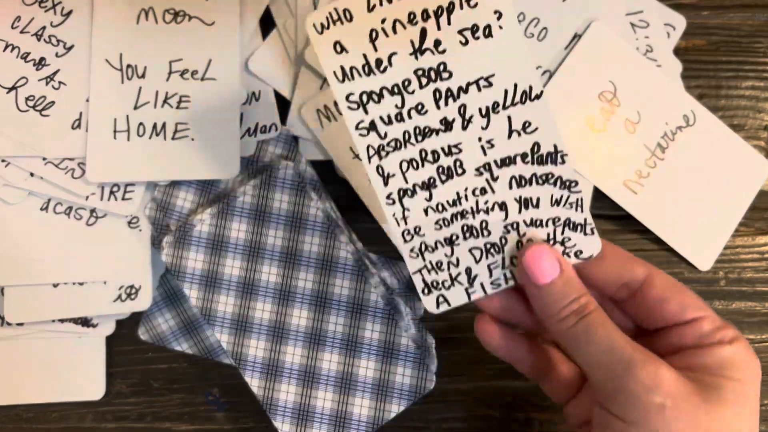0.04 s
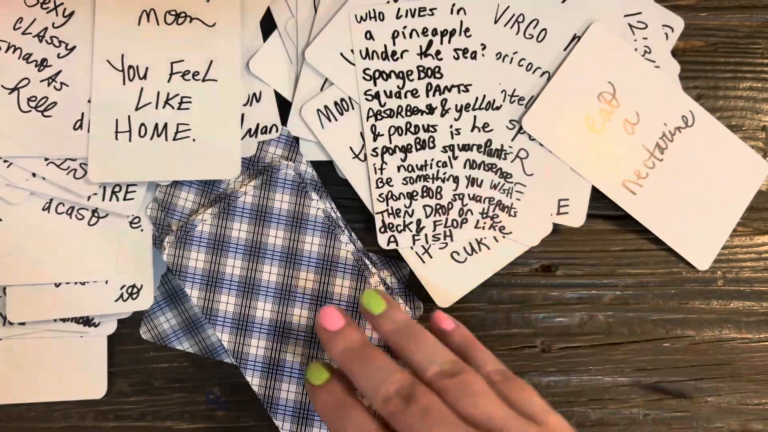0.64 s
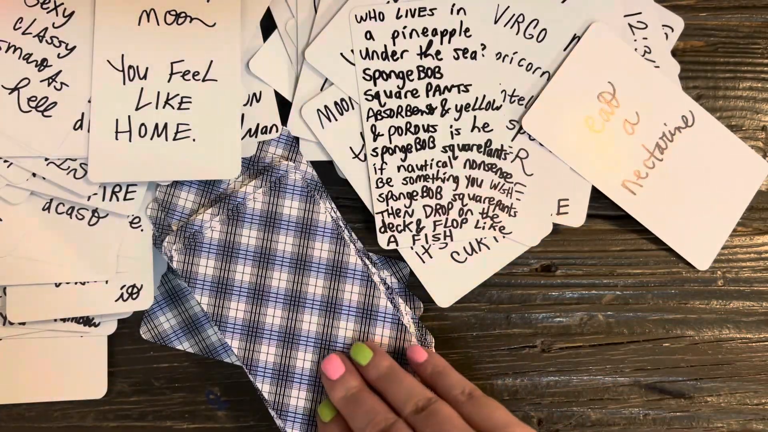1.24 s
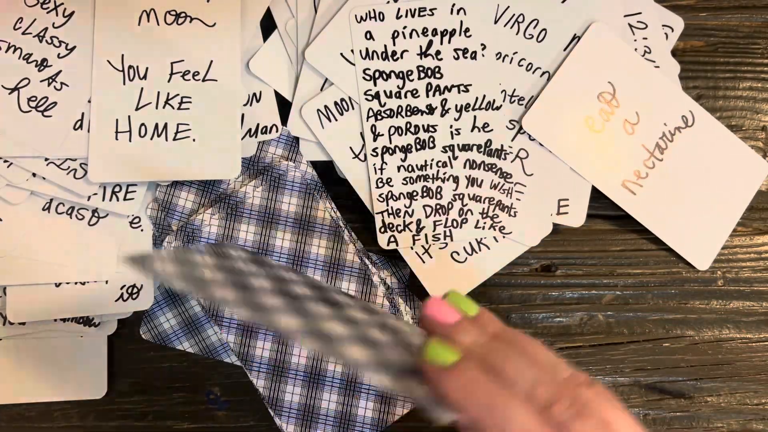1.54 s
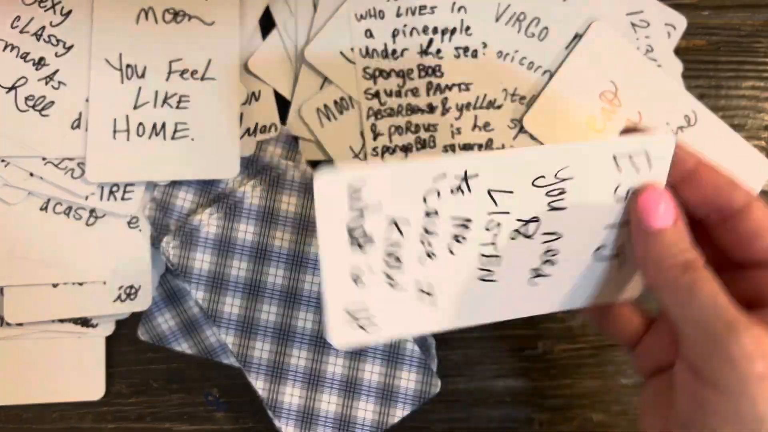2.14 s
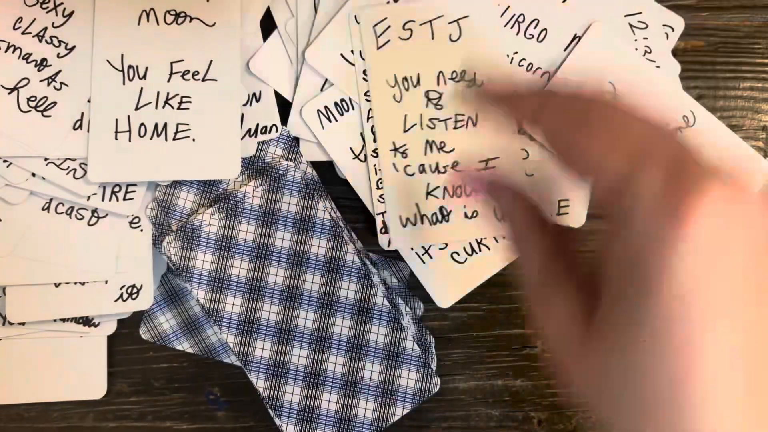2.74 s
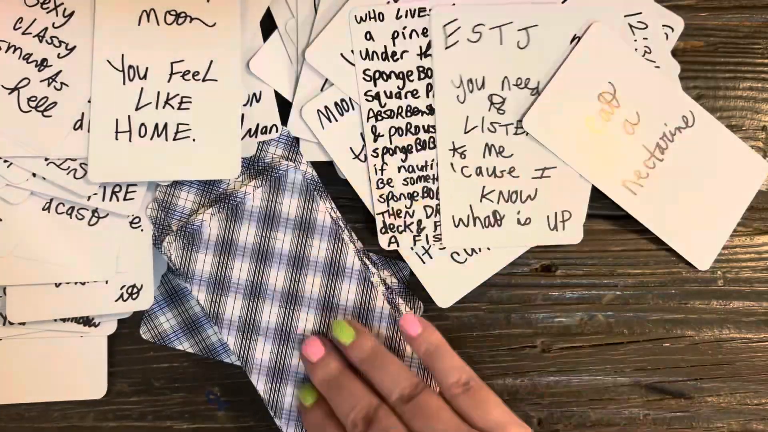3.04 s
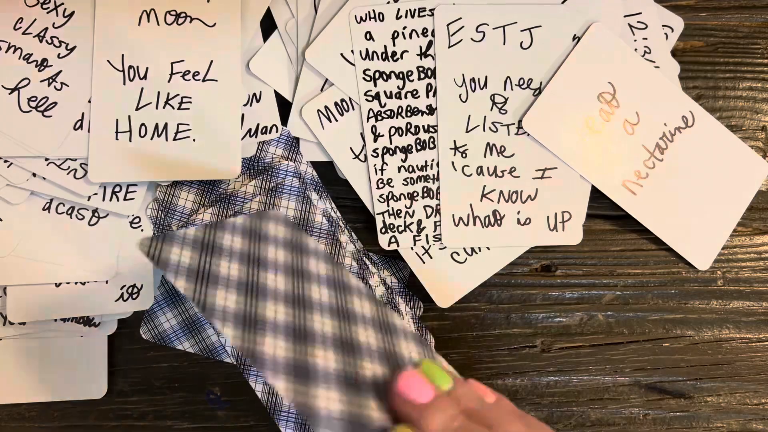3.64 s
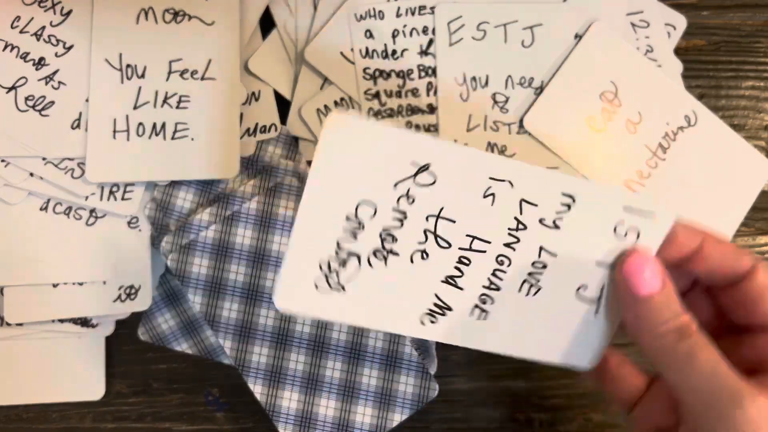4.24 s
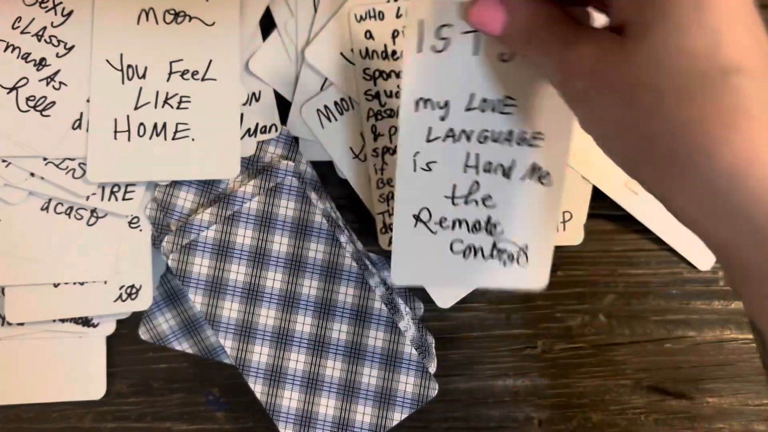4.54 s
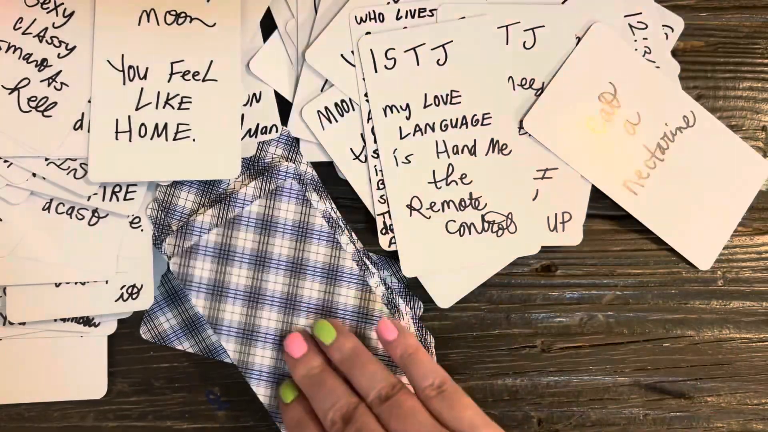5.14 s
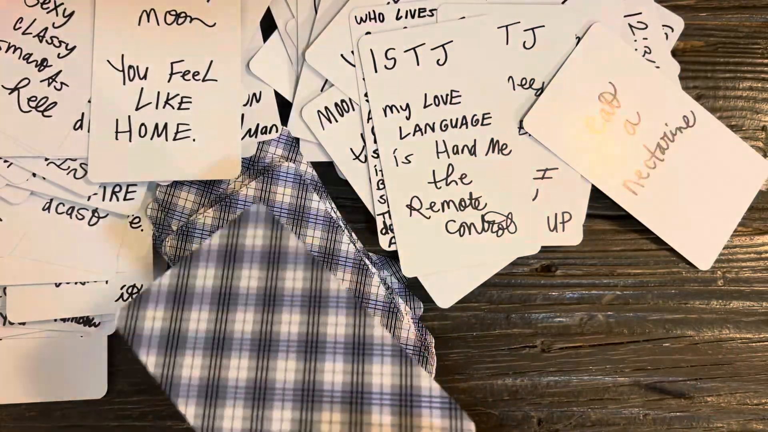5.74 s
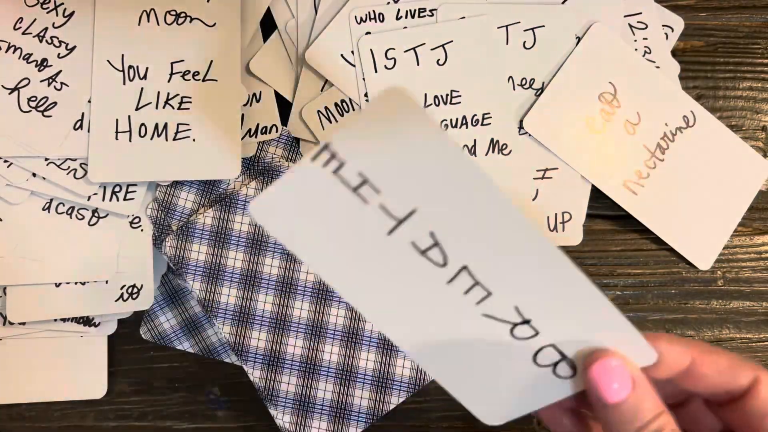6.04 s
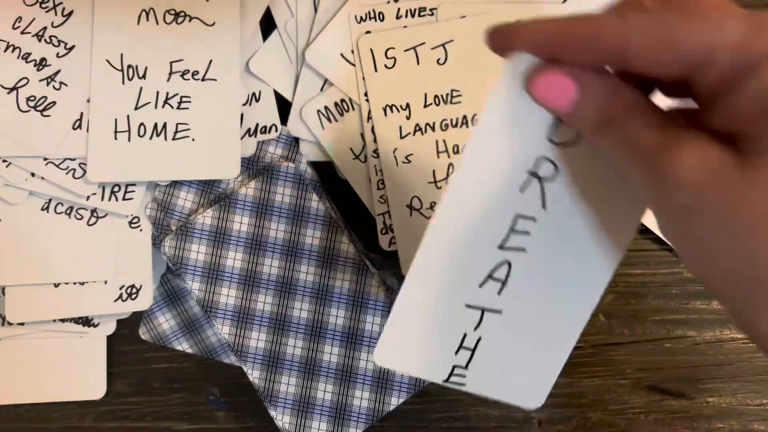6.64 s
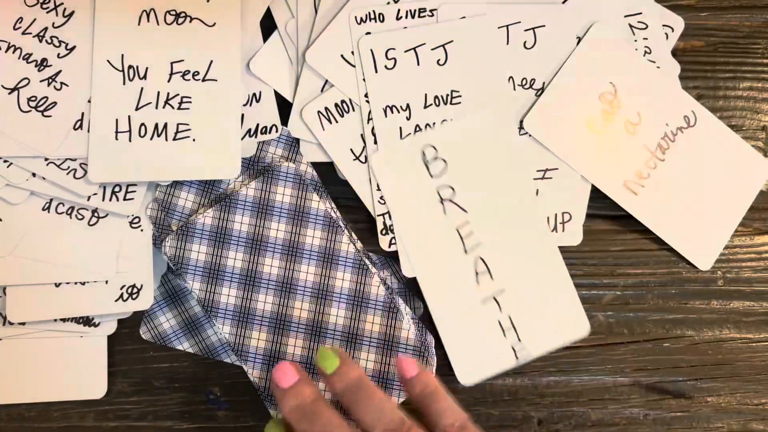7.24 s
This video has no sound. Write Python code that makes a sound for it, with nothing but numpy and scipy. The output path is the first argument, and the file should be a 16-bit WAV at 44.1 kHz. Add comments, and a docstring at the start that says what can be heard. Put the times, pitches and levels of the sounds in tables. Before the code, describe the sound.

Cards are drawn, turned over and set down one by one, with soft rasps, light taps and sharp snaps in a quiet room.

```python
"""Stiff paper cards are drawn off a deck, turned over and laid on a pile on a wooden table in a small room.
Each card rasps as it slides, clacks as its edge lands, and snaps flat when the thumb lets the bent corner go.
All card sounds are random clicks shaped by the card's resonances. Two closely spaced microphone ports
above the table pick them up with wall echoes, a low rumble and a faint machine hum."""
import sys
import numpy as np
from scipy import signal
from scipy.fft import rfft, irfft, next_fast_len
from scipy.io import wavfile

SR = 44100
rng = np.random.default_rng(int(sys.argv[2]) if len(sys.argv) > 2 else 0)


def master(y):
    """Save y as 16-bit WAV."""
    cut = np.clip(np.atleast_2d(y).T, -1, 1)
    pcm = np.round(cut * 32767)  # scale
    wavfile.write(sys.argv[1], SR, pcm.astype(np.int16))


N = 330309

# Frequencies in Hz at which a contact's colour and band levels are given. Card levels are relative.
CONTACT_HZ = [700, 1900, 4200, 8100, 14000]


def landings():
    """A card meets the pile edge first, slaps down on its face, then settles."""
    # Each row: slap time in s, clack, crack and sizzle in dB, clack and crack t60 in s, edge lead in s,
    # edge in dB, settling delay in s, thud in dB, thud pitch in Hz, echo delay in s, mode lifts in dB.
    rows = [(0.204, -42.5, -43, -43, 0.053, 0.0029, 0.0009, -64, .009, -43.5, 960, .00228, [-10, -5, 6, 5, 2.5, 9, -2, -3, 3.5]),
            (2.5164, -38.5, -31.5, -38.5, 0.059, 0.024, 0.0034, -52, 0.0029, -44.5, 760, .00146, [-6, 1.5, 2, 1, 3.5, 7.5, 0, 6, -0.5]),
            (4.6006, -48.5, -43.5, -61, 0.044, 0.0324, .0042, -54.5, 0.0034, -58.5, 700, 0.00142, [10, 7, -3, 5, -1, 3, 10.5, -1, -1.5]),
            (6.8450, -46.5, -48, -53.5, 0.026, 0.084, 0.0018, -55, 0.0048, -43.5, 560, .0018, [3, 2, -9, -2, 10, 7, 11, -4, 6])]
    # Each row: card resonance in Hz, width in Hz.
    card_modes = [(310, 51), (700, 177), (950, 120), (1350, 210), (1780, 170), (2220, 120), (2800, 240),
                  (3500, 570), (6400, 700)]
    edge_colour_db = [2.9, 0.99, 3.4, 9.9, 3.65]
    face_colour_db = [1.5, 1.5, -5, 8, -2.5]
    edge_t60_s = (0.033, 0.034)  # ring, crack
    out = np.zeros(N)
    for (at_s, clack_db, crack_db, sizzle_db, ring_t60_s, crack_t60_s, lead_s, edge_db,
         settle_s, thud_db, thud_hz, echo_s, lifts_db) in rows:
        modes = [(hz, db, width_hz) for (hz, width_hz), db in zip(card_modes, lifts_db)]
        contact(out, at_s - lead_s, np.add(edge_colour_db, edge_db), *edge_t60_s, modes, echo_s)
        face_db = np.add(face_colour_db, [clack_db, clack_db, crack_db, sizzle_db, sizzle_db])
        contact(out, at_s, face_db, ring_t60_s, crack_t60_s, modes, echo_s)
        thud(out, at_s + settle_s, thud_db, thud_hz, echo_s)
    return out


def snaps():
    """The thumb lets the bent corner go; it cracks flat and settles."""
    # Each row: time in s, level in dB, corner pitch in Hz, crack t60 in s, settling delay in s,
    # thud in dB, thud pitch in Hz, echo delay in s.
    rows = [(0.251, -57.5, 8000, 0.022, 0.016, -51, 1170, .0011),
            (2.5778, -43.5, 3600, 0.0082, 0.0044, -65, 1300, .00085),
            (4.6512, -39, 7000, 0.013, 0.00302, -54, 1198, 0.001056),
            (6.8968, -58, 5500, .02, 0.0056, -48, 900, 0.001)]
    # Each row: corner resonance in Hz, lift in dB, width in Hz.
    corner_modes = [(2700, 3.5, 310), (3584, 2.5, 590)]
    colour_db = [-2, -.5, -1.5, 0, 0.5]
    lift_db, width_octaves, ring_t60_s = 8.5, 0.7, 0.0186
    out = np.zeros(N)
    for at_s, db, corner_hz, crack_t60_s, settle_s, thud_db, thud_hz, echo_s in rows:
        octaves = np.log2(np.divide(CONTACT_HZ, corner_hz))
        corner_db = lift_db * np.exp(-(octaves / width_octaves) ** 2)
        band_db = np.add(colour_db, db + corner_db)
        contact(out, at_s, band_db, ring_t60_s, crack_t60_s, corner_modes, echo_s, slap=6)
        thud(out, at_s + settle_s, thud_db, thud_hz, echo_s)
    return out


def thud(out, at_s, db, pitch_hz, echo_s, lift_db=7.5, width_hz=510):
    """Add the dull contact of a card settling flat on the pile."""
    colour_db = [3, -18, -23, -20, -10.5]
    t60_s = (.032, .026)  # ring, crack
    contact(out, at_s, np.add(colour_db, db), *t60_s, [(pitch_hz, lift_db, width_hz)], echo_s)


def taps(lift_db=6, width_hz=300):
    """Nails and card edges tap the deck or pile, ringing one resonance set by where they land."""
    # Each row: time in s, low clack in dB, high crack in dB, t60 in s, resonance in Hz.
    rows = [(1.4042, -67, -74, 0.047, 1200), (1.458, -57, -67.5, 0.056, 1320),
            (1.468, -56, -66, 0.061, 2590), (3.269, -76, -72, 0.066, 3300), (3.525, -72, -62, 0.056, 3700),
            (3.5388, -48, -61, 0.022, 1448), (4.6621, -52.5, -55.5, 0.0083, 3220),
            (5.1226, -73, -70.5, 0.079, 3000), (5.8733, -75, -72.5, .05, 2600),
            (6.4959, -66, -58.5, 0.049, 6250), (6.5, -53.5, -61, 0.026, 910),
            (6.8527, -53, -50, 0.019, 6400)]
    colour_db = [6.5, -2, -4, 1, -10]
    out = np.zeros(N)
    for at_s, clack_db, crack_db, t60_s, pitch_hz in rows:
        band_db = np.add(colour_db, [clack_db, clack_db, crack_db, crack_db, crack_db])
        contact(out, at_s, band_db, t60_s, t60_s, [(pitch_hz, lift_db, width_hz)], echo_s=0.0019)
    return out


def contact(out, at_s, band_db, ring_t60_s, crack_t60_s, modes, echo_s, slap=4):
    """Add a touch, a slap and chatter dying to rest; the low bending waves arrive after the crack."""
    touch_s, bend_lag_s, crossover_hz = 0.0003, 0.00036, 2417
    t = np.arange(4096) / SR
    hz = np.fft.rfftfreq(len(t), 1 / SR)
    attack = np.minimum(t / touch_s, 1) ** 2
    response = hit_response(hz, band_db, modes, echo_s)
    ring_share = 1 / (1 + ((hz + 1) / crossover_hz) ** 6)
    for share, t60_s, lag_s in ((ring_share, ring_t60_s, bend_lag_s), (1 - ring_share, crack_t60_s, 0)):
        chatter = grains(len(t), per_s=12000, spread_db=-0.5)
        chatter[int(touch_s * SR)] = slap  # in units of the chatter's rms
        gain = response * np.sqrt(share) + 1e-7
        burst = minimum_phase(chatter * attack * decay(t, t60_s), gain)
        energy = np.mean(gain ** 2) * (SR / 2000) * (SR / 100)  # gain as rms per kHz over 10 ms
        add(out, at_s + lag_s, np.sqrt(energy) * unit_energy(burst))


def hit_response(hz, band_db, modes, echo_s, echo_gain=0.21):
    """Gain of a hit: tone colour, the card's resonances and a near echo off the table or hand."""
    # Tone colour of the card hits as picked up, with a dip near 12.5 kHz.
    # Each row: frequency in Hz, gain in dB.
    hit_colour = [(60, -12.5), (200, 3.5), (400, -5.5), (700, -1.5), (1300, 2.5), (2000, 2.5), (2600, 3.5),
                  (3600, 1), (6000, 0.5), (8000, -2.5), (10500, -1.5), (11900, -12), (13000, -14),
                  (14600, -5), (16400, -19)]
    tone_db = at_hz(list(zip(CONTACT_HZ, band_db)), hz) + at_hz(hit_colour, hz)
    comb = np.abs(1 + echo_gain * np.exp(-2j * np.pi * hz * echo_s)) / np.hypot(1, echo_gain)
    return from_db(tone_db + resonances_db(modes, hz)) * comb


def slide(strokes, rise_share, colour_db, sing_db, glide_octaves, width_share):
    """Card friction: grains swell with speed and judder; the free length sets a gliding resonance."""
    # Each stroke: fastest moment in s, length in s, level in dB, tilt in dB per octave, resonance in Hz.
    band_hz = [1400, 3000, 6300, 11200]  # where colour_db is given
    # Each row: frequency in Hz, rasp gain in dB.
    rasp_colour = [(300, -6), (700, -3.5), (1400, 2.5), (4500, 2.5), (9000, 7), (12600, 4.5), (15000, -2.5)]
    # A rubbed card lying on others. Each row: resonance in Hz, lift in dB, width in Hz.
    rubbed_modes = [(1780, 1.8, 490), (2716, 3.9, 450), (3350, 3, 300), (4300, 1.8, 400), (5900, 3.1, 510),
                    (7430, 4, 360)]
    judder_db, judder_per_s, scatter_db, pivot_hz = 1.5, 150, 1.5, 2000
    octaves = np.log2(np.array(band_hz) / pivot_hz)
    out = np.zeros(N)
    for fastest_s, length_s, db, tilt_db, pitch_hz in strokes:
        t = np.arange(-rise_share * length_s, (1 - rise_share) * length_s, 1 / SR)
        hz = np.fft.rfftfreq(len(t), 1 / SR)
        speed = np.interp(t, [t[0], 0, t[-1]], [0, 1, 0])
        grip = np.interp((t - t[0]) * judder_per_s, np.arange(200), rng.standard_normal(200))
        envelope = speed ** 0.82 * from_db(judder_db * grip)
        friction = grains(SR, per_s=2400, spread_db=-0.3)[:len(t)]
        spectrum = list(zip(band_hz, db + np.array(colour_db) + tilt_db * octaves))
        modes = [(mode_hz, lift_db + scatter_db * rng.standard_normal(), width_hz)
                 for mode_hz, lift_db, width_hz in rubbed_modes]
        rasp_db = at_hz(spectrum, hz) + at_hz(rasp_colour, hz) + resonances_db(modes, hz)
        rasp = irfft(rfft(friction) * from_db(rasp_db), len(t)) * np.sqrt(SR / 2000)
        centre_hz = pitch_hz * 2 ** (glide_octaves * np.linspace(-.5, .5, len(t)))
        sing = gliding_resonance(friction, centre_hz, width_share * pitch_hz)
        sing *= from_db(at_hz(spectrum, centre_hz) + sing_db)
        add(out, fastest_s + t[0], envelope * (rasp + sing))
    return out


def rubs():
    """Fingertips rub the top of the deck."""
    # Here and in the next four functions: stroke rows, then the remaining arguments of slide().
    strokes = [(1.186, 0.13, -65, 2, 2660), (2.1, 0.22, -82, 5.5, 2670), (3.213, 0.034, -62.5, -2.5, 2980),
               (3.275, 0.026, -60.5, -1, 3440), (4.32, 0.2, -77, 5, 2700), (5.2, 0.035, -61.5, -5, 2680),
               (5.219, 0.034, -62, -7, 2700), (5.31, .2, -72.5, -2.5, 2560),
               (5.495, 0.058, -64.5, -1.5, 2650), (5.761, 0.14, -78, 5.5, 2570),
               (6.565, 0.045, -62, 1.5, 2570), (7.25, 0.13, -68, 2.5, 5100), (7.31, 0.2, -68.5, 1, 3400),
               (7.43, 0.23, -70.5, -0.5, 2220)]
    timbre = (0.68, [-0.5, -1, -9, -23], 6.5, -0.12, 0.39)
    return slide(strokes, *timbre)


def pulls():
    """The top card is pulled off the deck; its resonance falls as more of it comes free."""
    strokes = [(1.375, 0.17, -67.5, -0.26, 3400), (3.42, 0.25, -67.5, -0.18, 3500),
               (5.5, 0.22, -68.5, -0.056, 3300)]
    timbre = (0.59, [0, -1, -7.5, -21], 5.1, -1.2, 0.22)
    return slide(strokes, *timbre)


def scrapes():
    """A card's edge scrapes over its neighbours or past the thumb."""
    strokes = [(1.032, 0.062, -62, 2, 6100), (1.397, 0.052, -65, -2.5, 2920), (1.482, .02, -63, -1, 4150),
               (1.912, 0.048, -63.5, -3, 4200), (2.253, 0.076, -65, 1, 6100),
               (2.565, 0.05, -56.5, 1.5, 3800), (3.53, 0.05, -58, -4, 3430),
               (4.644, 0.027, -55.5, -2, 1270), (5.58, 0.085, -63, 1.5, 3030),
               (5.62, 0.058, -63.5, 3.5, 6540)]
    timbre = (.6, [5.5, 1.5, -2, -16], 4, -0.14, 0.32)
    return slide(strokes, *timbre)


def brushes():
    """The card brushes the skin as it is turned over."""
    strokes = [(1.7, 0.2, -90, 0, 9000), (3.69, 0.095, -83.5, 0, 9000), (3.811, 0.11, -86, 0, 9000)]
    timbre = (0.41, [-2, -13, 1, 7], 0, .2, .25)
    return slide(strokes, *timbre)


def squeaks():
    """The card squeaks thinly as it swivels between the fingers."""
    strokes = [(6.453, 0.088, -66, 0, 4650), (6.478, 0.05, -68.5, 0, 3760)]
    timbre = (0.3, [-1, -5, -12, -19], 12, -0.09, 0.12)
    return slide(strokes, *timbre)


def cards():
    """The cards' sound in one direction; the fine grain differs for each direction."""
    hits = landings() + snaps() + taps()
    slides = rubs() + pulls() + scrapes() + brushes() + squeaks()
    return from_db(0.12) * hits + from_db(-4.5) * slides


def grains(size, per_s, spread_db):
    """Paper fibres catch and let go: random clicks of uneven strength, rms 1."""
    strength = from_db(spread_db * np.minimum(rng.exponential(1, size), 4))
    return unit_rms(strength * rng.standard_normal(size) * (rng.random(size) < per_s / SR))


def gliding_resonance(x, centre_hz, width_hz):
    """Ring x in one resonance with a moving centre; rms 1."""
    carrier = np.exp(2j * np.pi * np.cumsum(centre_hz) / SR)
    pole = np.exp(-np.pi * width_hz / SR)
    baseband = signal.lfilter([1], [1, -2 * pole, pole * pole], x / carrier)
    return unit_rms((baseband * carrier).real)


def resonances_db(modes, hz):
    """Summed lift of resonance peaks at each frequency."""
    return sum(db / (1 + (2 * (hz - pitch_hz) / width_hz) ** 2) for pitch_hz, db, width_hz in modes)


def minimum_phase(x, gain):
    """Filter by a gain curve, folding its cepstrum so that nothing sounds early."""
    size = len(x)
    fold = np.r_[1, np.full(size // 2 - 1, 2), 1, np.zeros(size // 2 - 1)]
    cepstrum = irfft(np.log(gain), size) * fold
    return irfft(rfft(x) * np.exp(rfft(cepstrum)), size)


def ports(x):
    """Direct sound reaches the two ports slightly out of step."""
    # Each row: frequency in Hz, lead of the left port in radians.
    phase_lead = [(500, 0.97), (2100, 0.3), (3300, 0.94), (6800, -1.58), (16000, -1.35)]
    size = next_fast_len(N + SR // 10)
    hz = np.fft.rfftfreq(size, 1 / SR)
    left = irfft(rfft(x, size) * np.exp(1j * at_hz(phase_lead, hz)), size)[:N]
    return np.array([left, x])


def wall_echoes(x, gap_s=0.0014, build_up_s=0.0045, likeness=0.62):
    """Dense echoes build up after a short gap and die soonest in the top treble."""
    # Each row: frequency in Hz, level against the direct sound in dB, t60 in s.
    reverb = [(256.6, -7.5, 0.19), (822, -7, 0.29), (2500, -9.5, 0.28), (6700, -10.5, 0.24),
              (10880, -13.5, 0.24), (14350, -11, 0.09)]
    edges_hz = np.geomspace(180, 16400, 21)
    t = np.arange(SR // 2) / SR
    onset = np.clip((t - gap_s) / build_up_s, 0, 1)
    response = 0
    for low_hz, high_hz in zip(edges_hz, edges_hz[1:]):
        centre_hz = np.sqrt(low_hz * high_hz)
        band_share = (high_hz - low_hz) / (SR / 2)
        bandpass = signal.butter(2, [low_hz, high_hz], "band", fs=SR, output="sos")
        tail = rng.standard_normal((2, len(t))) * onset * decay(t, at_hz(reverb, centre_hz, column=2))
        pair = unit_energy(stereo(*signal.sosfilt(bandpass, tail), likeness))
        response += from_db(at_hz(reverb, centre_hz)) * np.sqrt(2 * band_share) * pair
    return signal.fftconvolve(x[None], response, axes=1)[:, :N]


def rumble(top_hz=160):
    """Low room noise that swells and sinks."""
    # Each row: frequency in Hz, relative density in dB.
    spectrum = [(15, -40), (25, -41), (33, -30), (44, -12.5), (54, -1), (66, -1.5), (84, -5.5), (98, -13),
                (125, -15), (160, -27)]
    # Each row: time in s, rms level in dB.
    levels = [(0, -46), (1.3, -48), (2.25, -47.5), (2.8, -47.5), (3.45, -44), (3.6, -51.5), (4.0, -50.5),
              (4.15, -46), (6.2, -46.5), (7.4, -43)]
    swell_db = np.interp(np.arange(N) / SR, *np.transpose(levels))
    return from_db(swell_db) * diffuse(lambda hz: from_db(at_hz(spectrum, hz)) * (hz < top_hz))


def air(rms_db=-56.5):
    """Soft, steady air noise."""
    # Each row: frequency in Hz, relative density in dB.
    spectrum = [(90, -20), (170, -2), (320, 0), (480, -10.5), (630, -10), (800, -20), (1000, -21.5),
                (1600, -18), (2050, -18.5), (2900, -27.5), (5000, -32.5), (6500, -30.5), (13000, -42.5),
                (16000, -60)]
    return from_db(rms_db) * diffuse(lambda hz: from_db(at_hz(spectrum, hz)))


def machine_hum():
    """A distant machine: narrow noise bands heard as wavering tones."""
    # Each row: frequency in Hz, rms level in dB, half-width in Hz, left minus right in dB.
    lines = [(117.2, -61.5, 6.7, 1.5), (131.5, -60, 3.7, 1), (289.5, -63.5, 4.6, 7),
             (405.8, -69.5, 3.84, 1), (542.5, -73.5, 10, 6), (583.2, -65.5, 7.23, -1)]
    out = 0
    for line_hz, db, width_hz, pan_db in lines:
        tone = diffuse(lambda hz: 1 / (1 + ((hz - line_hz) / width_hz) ** 2))
        out += from_db([[db + pan_db / 2], [db - pan_db / 2]]) * tone
    return out


def diffuse(gain_at):
    """Steady room noise of a given spectrum, partly alike at the two ports; rms 1."""
    # Each row: frequency in Hz, left-right likeness from 0 to 1.
    likeness = [(60, 1), (130, 0.95), (290, 0.43), (640, 0), (1400, 0.83), (3100, 0.3), (7000, 0.17),
                (15000, 1)]
    size = next_fast_len(N)
    hz = np.fft.rfftfreq(size, 1 / SR)
    mid, side = rfft(rng.standard_normal((2, size))) * gain_at(hz)
    return unit_rms(irfft(stereo(mid, side, at_hz(likeness, hz)), size)[:, :N])


def stereo(mid, side, likeness):
    """Left and right from two independent noises, correlated by likeness."""
    return np.sqrt(1 + likeness) * mid + np.sqrt(1 - likeness) * side * [[1], [-1]]


def from_db(db):
    """Decibels to gain."""
    return 10 ** (np.asarray(db) / 20)


def unit_rms(x):
    """Scale to rms 1."""
    return x / np.sqrt(np.mean(x ** 2) + 1e-20)


def unit_energy(x):
    """Scale to energy 1."""
    return x / np.sqrt(np.sum(x ** 2) + 1e-20)


def at_hz(points, hz, column=1):
    """Interpolate a table column over log frequency."""
    points = np.array(points)
    return np.interp(np.log(np.maximum(hz, 1)), np.log(points[:, 0]), points[:, column])


def decay(t, t60_s):
    """Envelope falling 60 dB in t60_s."""
    return np.exp(-np.log(1000) * t / t60_s)


def add(track, at_s, sound):
    """Mix a short sound into the track."""
    start = max(int(at_s * SR), 0)
    track[start:start + len(sound)] += sound[:N - start]


def scene():
    """Close cards, their echoes off walls in three directions, and the room's own noise."""
    echoes = sum(wall_echoes(cards()) for _ in range(3)) / np.sqrt(3)
    return ports(cards()) + echoes + rumble() + air() + machine_hum()


def record(dry):
    """Steep low-pass at 16.4 kHz."""
    return signal.sosfilt(signal.ellip(10, .2, 70, 16400, fs=SR, output="sos"), dry)


dry = scene()
out = record(dry)
master(out)
```